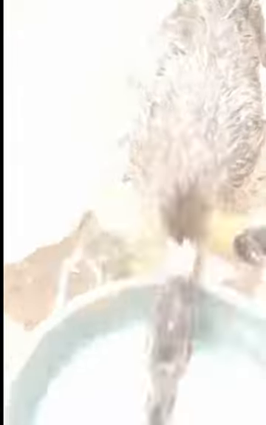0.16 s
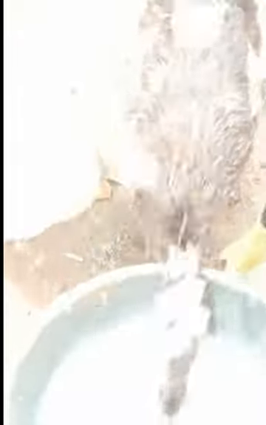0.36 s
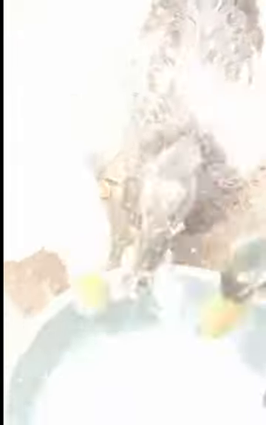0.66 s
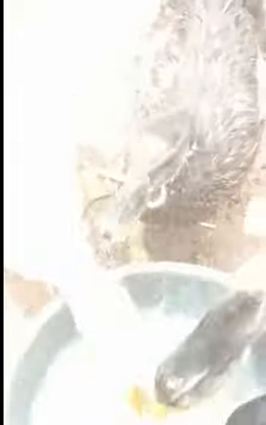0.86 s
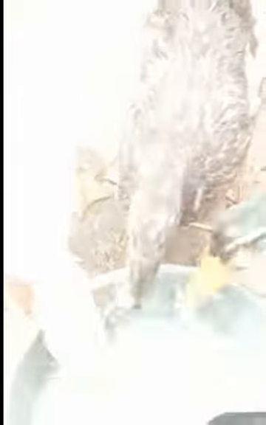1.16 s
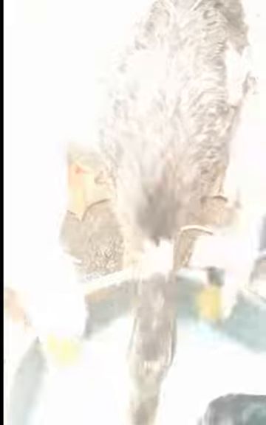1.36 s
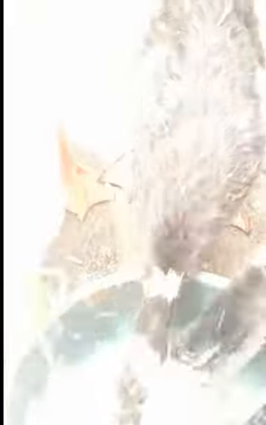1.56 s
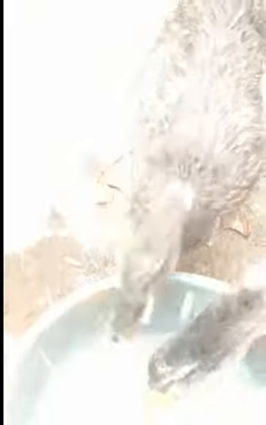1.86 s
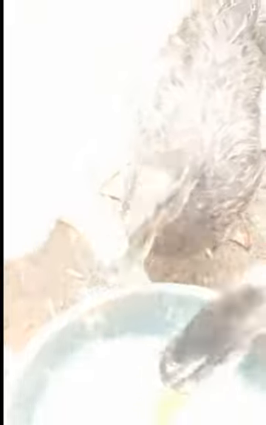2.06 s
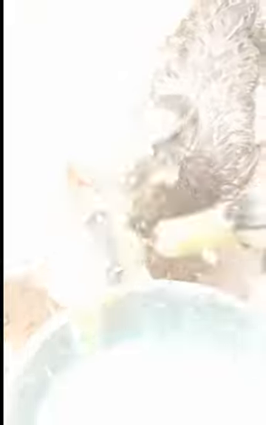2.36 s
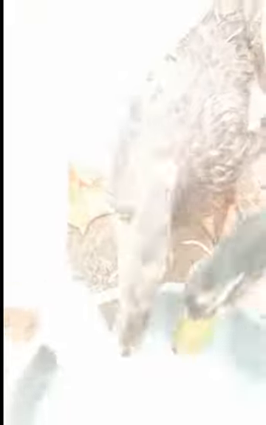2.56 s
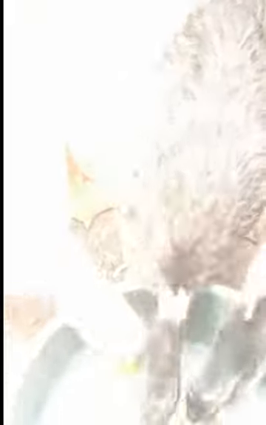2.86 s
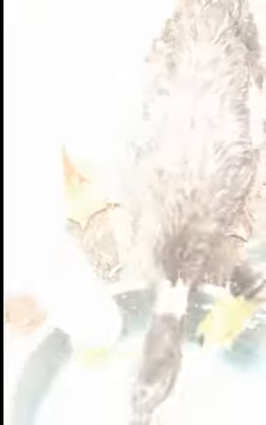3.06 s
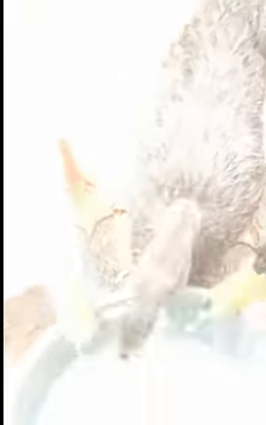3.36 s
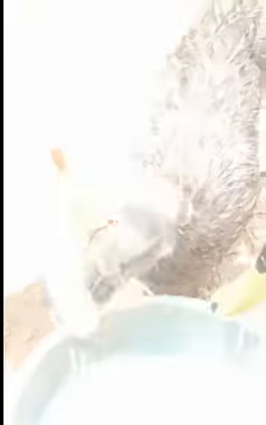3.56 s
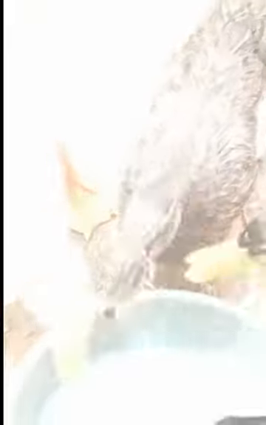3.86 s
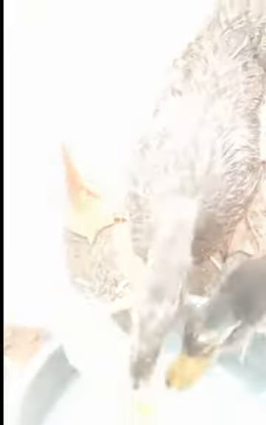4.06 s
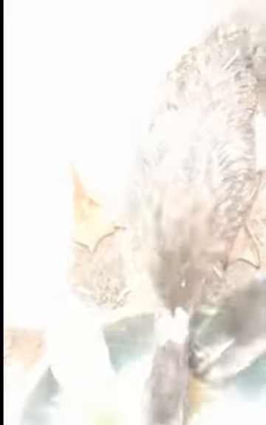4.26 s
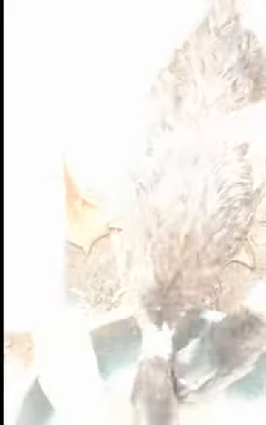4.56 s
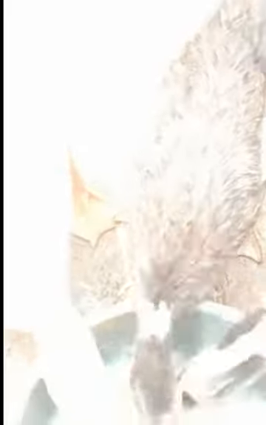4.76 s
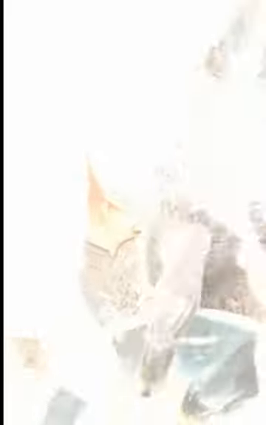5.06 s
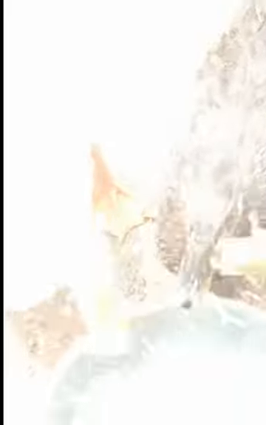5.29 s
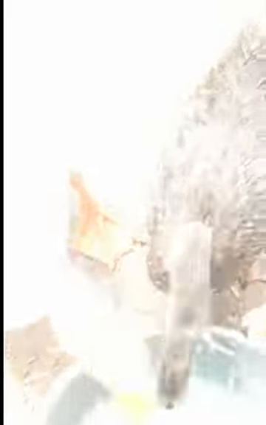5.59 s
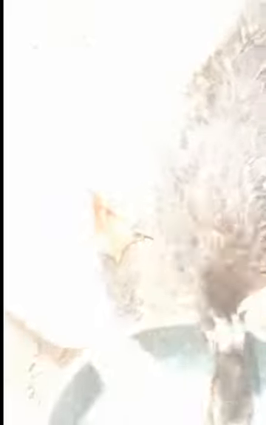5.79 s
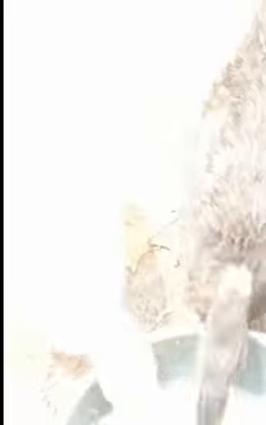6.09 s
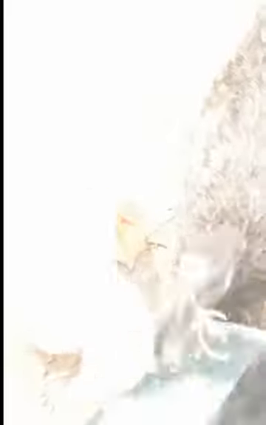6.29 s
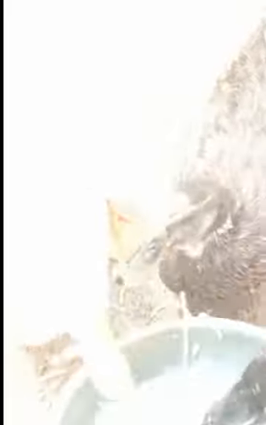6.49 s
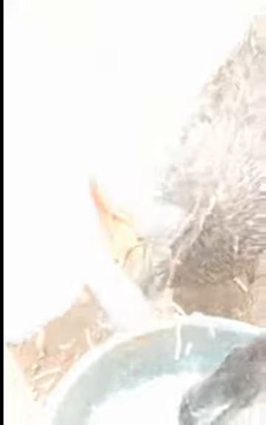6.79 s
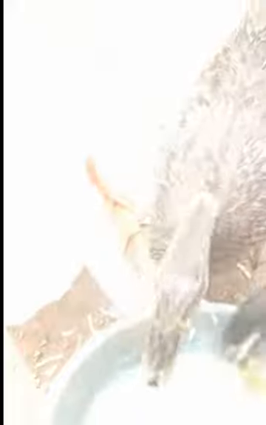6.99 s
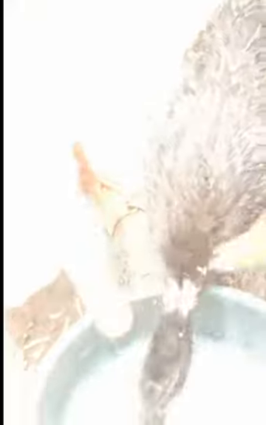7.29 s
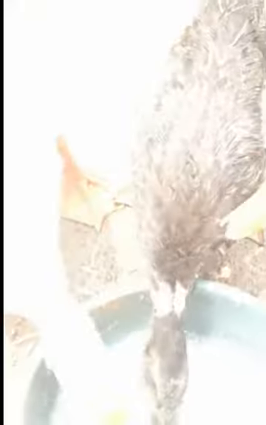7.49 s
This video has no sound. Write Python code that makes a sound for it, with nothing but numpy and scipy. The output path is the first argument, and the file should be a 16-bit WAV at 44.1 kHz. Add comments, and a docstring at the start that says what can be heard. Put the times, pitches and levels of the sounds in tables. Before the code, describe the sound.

Very close outdoors, ducks work their bills in a plastic bowl of water. Rapid bubbly chattering comes in uneven bouts, with hollow plops that ring the bowl and bright clicking drops. Short raspy quacks come mostly early. Past the middle a brief jet of water hisses, then two soft footfalls thud well apart. Dabbling and dripping continue, with lighter gaps, over faint air.

```python
"""Outdoors, close to the microphone, ducks dabble in a plastic bowl of water over faint low air.
From the start, short, rattling quacks (pulses ringing a throat) are scattered among bouts of churned bubbles.
Bills plunge with a hollow plop that rings the bowl, and drops click and ring as they fall back throughout.
Past the middle a jet of water hisses (shaped noise), then two soft footfalls thud, well apart.
Dabbling, drops and a few quacks go on towards the end; short echoes follow every near sound."""
import sys
import numpy as np
from scipy import signal
from scipy.fft import rfft, irfft, next_fast_len
from scipy.io import wavfile
from scipy.ndimage import map_coordinates

SR = 44100
rng = np.random.default_rng(int(sys.argv[2]) if len(sys.argv) > 2 else 0)


def wav_out(sig):
    """Save sig, one row per channel (or a flat mono array), as 16-bit PCM at SR to the path in sys.argv[1]."""
    wavfile.write(sys.argv[1], SR, np.round(np.clip(np.atleast_2d(sig).T, -1, 1) * 32767).astype(np.int16))


N = 336924


def amp(db):
    """Decibels to gain."""
    return 10 ** (np.asarray(db) / 20)


def unit(x):
    """x scaled to rms 1."""
    return x / np.sqrt(np.mean(x ** 2) + 1e-20)


def along(points, hz):
    """(frequency [Hz], value) points read on a log frequency axis."""
    point_hz, value = np.transpose(points)
    return np.interp(np.log(hz + 1), np.log(point_hz + 1), value)


def curves(rows):
    """One value per sample for each column after the time."""
    s, *columns = np.transpose(rows)
    return [np.interp(np.arange(N) / SR, s, column) for column in columns]


def wobble(rate):
    """A smooth random curve, rate knots a second."""
    knots = rng.standard_normal(int(N * rate / SR) + 4)
    return map_coordinates(knots, [np.arange(N) * rate / SR])


def add(track, s, sound):
    """Mix a sound into the track from time s on."""
    start = int(np.clip(round(s * SR), 0, N - 1))
    track[start:start + len(sound)] += sound[:N - start]


def coloured(x, gains, size=8192):
    """x through a causal, minimum-phase filter with the given (frequency [Hz], gain [dB]) points."""
    log_gain = np.log(amp(along(gains, np.fft.rfftfreq(size, 1 / SR))))
    cepstrum = irfft(log_gain)
    # folding the cepstrum forward makes the filter causal
    cepstrum[1:size // 2] *= 2
    cepstrum[size // 2 + 1:] = 0
    return signal.oaconvolve(x, irfft(np.exp(rfft(cepstrum))))[:N]


def swell(t, rise):
    """An envelope that reaches 1 at t = rise and then dies away."""
    u = np.maximum(t, 0) / rise
    return (u * np.exp(1 - u)) ** 2


def bubble(t, hz, rise, glide):
    """A pocket of air rings briefly; its pitch climbs for a positive glide, falls for a negative one."""
    bent_t = t + glide * (t - rise) ** 2 / (rise + t)
    return swell(t, rise) * np.sin(2 * np.pi * hz * bent_t)


def bubbles(rate, low_hz, high_hz, cycles, spread_db, size):
    """A cloud of random bubbles, many faint and a few strong, of rms 1."""
    draws = rng.random((int(rate * N / SR), 4), dtype=np.float32)
    when, pitch, life, strength = draws.T[:, :, None]
    hz = low_hz * (high_hz / low_hz) ** pitch
    gain = amp(-spread_db * np.log(strength + .01))
    rise = cycles * (.3 + 1.4 * life) / hz
    grains = gain * bubble(np.arange(size, dtype=np.float32) / SR, hz, rise, glide=.015)
    where = (when * N).astype(int) + np.arange(size)
    return unit(np.bincount(where.ravel(), grains.ravel(), N)[:N])


def bursts(times, levels_db, rise, t60):
    """An envelope that jumps at each event and dies away."""
    envelope, t = np.zeros(N), np.arange(SR // 5) / SR
    for s, db in zip(times, levels_db):
        add(envelope, s, amp(db - 60 * t / t60) * (1 - np.exp(-t / rise)))
    return envelope


# tone of the faint outdoor air: (frequency [Hz], relative level [dB])
AIR_TONE = [(20, -24), (60, 5), (130, 12), (280, 13), (600, -10), (900, -43), (2500, -27), (7000, -10.5),
            (9500, -35), (16000, -28)]


def outdoor_air():
    """Steady noise, strongest in the lows, lies behind everything."""
    return amp(-62.5) * unit(coloured(rng.standard_normal(N), AIR_TONE))


# a webbed foot pats the ground: (time [s], level [dB], pitch [Hz])
FOOT_PATS = [(5.199, -38.5, 220), (6.106, -33.5, 147)]


def footfalls():
    """Each step is one soft, low thud: a short swell of steady pitch."""
    track, t = np.zeros(N), np.arange(SR // 8) / SR
    for s, db, hz in FOOT_PATS:
        add(track, s, amp(db) * bubble(t, hz, 0.0053, glide=0))
    return track


# the duck's throat: (multiple of the call's throat pitch, relative level [dB], t60 [s])
THROAT_MODES = [(1.001, -13.5, 0.022), (1.38, -9, 0.015), (1.92, -19.5, 0.031), (2.3, -22, 0.059)]


def quack(length, throat_hz, bright_db, pulse_hz=76, glide=0.134):
    """Slow, uneven, raspy pulses of the syrinx ring the throat; its resonances rise as the bill opens."""
    call, t = np.zeros(SR // 6), np.arange(SR // 30) / SR
    ratio, mode_db, t60 = np.transpose(THROAT_MODES)[:, :, None]
    tilt_db = mode_db + bright_db * np.log2(ratio)
    for k, (strength, detune, phase) in enumerate(rng.standard_normal((8, 3, len(THROAT_MODES), 1))):
        # a drifting phase roughens each resonance
        rasp = np.cumsum(rng.standard_normal((len(THROAT_MODES), len(t))), axis=1) * .01
        progress = k / pulse_hz / length
        if progress >= 1:
            continue
        hz = throat_hz * ratio * (1 + glide * (progress - .5) + .045 * detune)
        gain = amp(tilt_db + 2.5 * strength - 60 * t / t60)
        ringing = (gain * np.sin(2 * np.pi * (hz * t + phase + rasp))).sum(0)
        pulse = ringing * (1 - np.exp(-t / .0025))
        start = int(abs(k + .26 * phase[0, 0]) / pulse_hz * SR)
        call[start:start + len(t)] += amp(-22 * (progress - .45) ** 2) * pulse
    return call / np.sqrt(np.sum(call ** 2) / (length * SR))


# quacks: (time [s], length [s], rms level [dB], throat pitch [Hz], brightness [dB per octave])
QUACK_CALLS = [(0.002, 0.033, -38.5, 1225, 2), (0.382, 0.052, -30.5, 1550, -1.5),
               (0.675, 0.074, -37, 1254, 3.5), (1.086, 0.037, -31.5, 1390, 1),
               (3.612, 0.062, -44, 1506, 0.5), (5.111, 0.042, -37.5, 1720, -6.5),
               (5.517, 0.088, -44.5, 1587, -7), (6.153, 0.054, -43, 1646, 0),
               (6.936, .042, -44.5, 1615, -15), (7.006, .028, -45, 1840, -15),
               (7.323, 0.061, -39.5, 1550, -17)]


def quacks():
    """The ducks call softly, each call with its own throat pitch and brightness."""
    track = np.zeros(N)
    for s, length, db, throat_hz, bright_db in QUACK_CALLS:
        add(track, s, amp(db) * quack(length, throat_hz, bright_db))
    return track


# a hissing jet of water squeezed from a bill: (time [s], level [dB])
JET_LEVEL = [(4.62, -62), (4.74, -26.5), (4.799, -19), (4.855, -16.5), (4.885, -31.5), (4.94, -77)]
# tone of the jet's mist: (frequency [Hz], relative level [dB])
JET_TONE = [(1500, -19), (3000, 6.5), (5000, 8.5), (7000, 14.5), (10000, -8.5), (16000, -1.5)]


def jet():
    """The squirt breaks up into a fine, bright mist: shaped noise with a fluttering level."""
    s, db = np.transpose(JET_LEVEL)
    level_db = np.interp(np.arange(N) / SR, s, db, left=-120, right=-120)
    return amp(level_db + 1.3 * wobble(82)) * unit(coloured(rng.standard_normal(N), JET_TONE))


def seethe(grains, level_db):
    """Calm water hisses smoothly; the harder it is stirred, the more its single bubbles stand out."""
    share = np.interp(level_db, [-54, -36], [.3, .85])
    return np.sqrt(share) * grains + np.sqrt(1 - share) * rng.standard_normal(N)


def nibbling(rate, base):
    """Quick, uneven snaps of the bills: each squeezes out a sharp spurt of bubbles. Rms 1."""
    when, size = rng.random((int(rate * N / SR), 2)).T
    times = (np.arange(len(when)) + 1.6 * when) / rate
    return unit(np.hypot(base, bursts(times, -11 * size, rise=.0005, t60=.05)))


# bouts of dabbling, while a bill works in the water; churn() trims the levels:
# (start [s], length [s], sloshing [dB], bubbling [dB], spray [dB])
DABBLING_BOUTS = [(0.0, 0.597, -69, -45.5, -40.5), (0.862, 0.43, -43, -29.5, -36),
                  (1.514, 0.079, -43, -31, -32.5), (1.759, 0.15, -58, -37.5, -50),
                  (2.051, 0.3, -72.5, -47.5, -47), (2.541, 0.13, -54, -34.5, -38.5),
                  (2.758, 0.28, -42, -30, -34), (3.816, 0.3, -53, -35.5, -38.5),
                  (4.176, .67, -37.5, -30, -31), (5.131, 0.082, -61.5, -40, -42.5),
                  (5.769, 0.19, -38.5, -30.5, -35), (6.053, 0.13, -65, -36, -47),
                  (6.35, 0.28, -46, -36, -39), (7.289, 0.03, -54, -40.5, -53),
                  (7.511, 0.055, -45, -37.5, -39)]
# dying down once the bill lifts: (sloshing, bubbling, spray) [dB per s]
SETTLING = (149, 83, 72)
# water running off the lifted bill, relative to the bout: (sloshing, bubbling, spray) [dB]
DRIBBLE = (-23, -15, -7.5)
DIP_S = 0.094  # the bill sinks in and the churning builds up
DRAIN_DB_PER_S = 13.5  # the dribble thins out


def stirring():
    """Levels in dB of sloshing, bubbling and spray: each bout builds, holds, settles and dribbles."""
    t, power = np.arange(0, N, 64) / SR, 1e-9
    settle, dribble_db = np.array([SETTLING, DRIBBLE])[:, :, None]
    for start, length, *levels_db in DABBLING_BOUTS:
        build = np.clip(1 + (t - start) / DIP_S, 0, 1) ** 2
        lifted = np.maximum(t - start - length, 0)
        fade_db = np.maximum(-settle * lifted, dribble_db - DRAIN_DB_PER_S * lifted)
        power = power + (build * amp(np.array(levels_db)[:, None] + fade_db)) ** 2
    return curves(np.column_stack([t, *(10 * np.log10(power))]))


# filters that tone the large bubbles, the middle ones, the small ones and the finest mist flung up
# by the sloshing; each result is levelled to rms 1: (frequency [Hz], relative gain [dB])
SLOSH_TONE = [(30, -39), (150, -21.5), (250, -10), (480, -1.5), (660, 0), (830, -6), (1300, 1),
              (3000, -39.5)]
FROTH_TONE = [(300, -73), (850, -16.5), (1250, -14), (2000, 3), (3200, 4), (4200, -6), (6000, 7.5),
              (9000, -31)]
FIZZ_TONE = [(1000, -27.5), (2800, -7), (4500, -7), (6000, -1), (7200, 5), (9000, -21.5), (16000, -21)]
HAZE_TONE = [(5000, -46), (8000, 1), (9500, -2), (13000, -3), (16000, 4)]
HAZE_DB, HAZE_GROWS = -22.5, 0.65  # mist over the scaled sloshing [dB]; dB of mist per dB of sloshing
LEAD_S = 0.0038  # water starts to splash just before a drop's bubble is loudest


def churn():
    """Chattering bills stir three sizes of bubbles and a fine mist; plunges and drops throw up more."""
    slosh_db, bubbling_db, spray_db = stirring()
    # the snaps stand out while the bills work and soften in the pauses
    busy = np.interp(bubbling_db, [-54, -42], [.45, .95])
    chatter = busy * nibbling(rate=52, base=.17) + 1 - busy

    plunge_s, plunge_db, _, slap_db = np.transpose(BILL_PLUNGES)
    drop_s, level_db, drop_hz, life = np.transpose(LOUD_DROPS)
    drop_db = level_db - 10 * np.log10(np.maximum(life / .001, 1))  # long ringing drops splash less
    octaves = np.log2(drop_hz / 4500)  # high drops scatter finer spray
    slaps = bursts(plunge_s, plunge_db + slap_db - 7.5, rise=0.0011, t60=0.058)
    coarse_db = drop_db - 11.5 - 10 * np.maximum(octaves, 0)
    coarse = bursts(drop_s - LEAD_S, coarse_db, rise=.005, t60=0.041)
    fine = bursts(drop_s - LEAD_S, drop_db - 6.5 + 3 * octaves, rise=0.0039, t60=0.025)
    flung = bursts(plunge_s, plunge_db - 26, rise=0.0012, t60=0.1)

    slosh = bubbles(260, 161.7, 1516, cycles=1.26, spread_db=0.5, size=1800)
    froth = bubbles(900, 1150, 4800, cycles=2.4, spread_db=3.8, size=700)
    fizz = bubbles(2100, 3200, 14000, cycles=3.4, spread_db=4.4, size=270)
    slosh = unit(coloured(slosh, SLOSH_TONE))
    haze = unit(coloured(seethe(fizz, slosh_db - 20), HAZE_TONE))
    froth = unit(coloured(seethe(froth, bubbling_db - 2), FROTH_TONE))
    fizz = unit(coloured(seethe(fizz, spray_db - 4), FIZZ_TONE))

    # independent causes add as powers
    slosh_gain = amp(slosh_db + 2.2) * np.sqrt(chatter)
    froth_gain = np.hypot(amp(bubbling_db - 2.5) * chatter, np.hypot(slaps, coarse))
    fizz_gain = np.hypot(amp(spray_db + 2.0) * chatter, fine)
    haze_gain = np.hypot(amp(HAZE_GROWS * slosh_db + HAZE_DB) * chatter, flung)
    return slosh * slosh_gain + froth * froth_gain + fizz * fizz_gain + haze * haze_gain


STRAYS_PER_S = 8.1  # smaller drops fall at random
STRAY_DB, STRAY_SPREAD_DB = 3.5, 7  # highest level over the scaled spray; how far below it they range
STRAY_LOW_HZ, STRAY_HIGH_HZ, STRAY_LIFE_S = 1720, 7580, 0.0017  # range of bubble pitch, mean life
STRAY_GROWS = 0.59  # dB of drop per dB of spray


def strays():
    """Smaller drops at random, as rows like LOUD_DROPS: the more spray, the harder they fall."""
    spray_db = stirring()[2]
    when, size, pitch, life = rng.random((int(STRAYS_PER_S * N / SR), 4)).T
    spray_then_db = spray_db[(when * N).astype(int)]
    level_db = STRAY_GROWS * spray_then_db + STRAY_DB - STRAY_SPREAD_DB * size
    hz = STRAY_LOW_HZ * (STRAY_HIGH_HZ / STRAY_LOW_HZ) ** pitch
    return list(zip(when * N / SR, level_db, hz, STRAY_LIFE_S * (.5 + life)))


# the loudest drops and wet bill clicks: (time [s], level [dB], bubble pitch [Hz], life [s])
LOUD_DROPS = [(0.209, -8, 3400, .0008), (.448, -11, 5060, 0.00034), (.556, -17, 3450, 0.0014),
              (0.7818, -6, 7450, 0.00036), (0.8614, 0.5, 4070, 0.00064), (0.872, -5, 2310, 0.0011),
              (.9374, -8, 2300, 0.00092), (.943, 0, 3020, 0.0012), (1.037, -9, 2270, 0.00089),
              (1.126, -9, 6370, .0009), (1.153, -9, 2050, .0024), (1.272, -13, 3040, .0013),
              (1.4025, -12, 2980, 0.0022), (1.464, -7, 6080, 0.0014), (1.566, -6.5, 7170, 0.0024),
              (1.638, -5, 2970, 0.0013), (1.7512, -6.5, 2940, .0005), (1.756, -5.5, 5000, .0007),
              (2.023, -4, 6620, 0.0012), (2.041, -19, 2030, 0.0027), (2.654, -12.5, 5800, .001),
              (2.837, -7.5, 6830, .001), (2.897, -0.5, 3140, .0008), (2.9727, -9.5, 3400, 0.0009),
              (3.006, -10.5, 6170, 0.00085), (3.071, -10, 1940, 0.0025), (3.223, -15.5, 6300, .0009),
              (3.3191, -9.5, 3290, 0.0035), (3.7226, -16.5, 7250, .0031), (4.55, -5, 3220, 0.00071),
              (4.614, -8, 7250, 0.0024), (5.139, -16.5, 6050, .0012), (5.191, -9, 7330, .0012),
              (5.28, -6.5, 6980, .001), (5.287, -5, 3980, 0.00064), (5.2897, -3, 6980, 0.00099),
              (5.796, -5.5, 3040, .0008), (5.916, -6.5, 2220, 0.0014), (6.1272, -18, 6600, .001),
              (6.335, -10.5, 1990, 0.00073), (6.5163, -8, 7170, 0.0013), (6.592, -4.5, 3694, .0015),
              (6.6176, -13, 2250, 0.0014), (6.771, -13.5, 7140, 0.00097), (6.832, -15.5, 2980, .0005),
              (7.302, -14, 6530, .0012), (7.399, -18.5, 6700, 0.00076), (7.4553, -15, 6600, 0.00062),
              (7.5853, -9.5, 6400, .001)]


def drops():
    """Each drop clicks on the surface and traps one loud bubble, with three smaller ones after it."""
    track, t = np.zeros(N), np.arange(SR // 30) / SR
    for s, db, hz, life in LOUD_DROPS + strays():
        rise = .52 * life
        splash = min(1, .001 / life)  # a gentle drop rings longer and splashes less
        click = splash * amp(-10) * bubble(t, 4200, .00016, glide=.02)
        add(track, s - rise, amp(db) * (bubble(t, hz, rise, glide=.02) + click))
        for delay, pitch, size in rng.random((3, 3)):
            small_hz = min(hz * 2 ** (1.4 * (pitch - .6)), 7500)
            small = bubble(t, small_hz, .0005, glide=.02)
            add(track, s + .006 * delay, splash * amp(db - 8 - 9 * size) * small)
    return track


GULPS_PER_S = 14  # a working bill pumps the water
GULP_DB, GULP_SPREAD_DB = 18, 10  # highest level over the sloshing; how far below it they range
GULP_HZ, GULP_SLAP_DB = 383, -1  # middle cavity pitch; slap as in BILL_PLUNGES


def gulps():
    """Small plunges in an uneven beat all through each bout, as rows like BILL_PLUNGES."""
    rows = []
    for start, length, slosh_db, _, _ in DABBLING_BOUTS:
        for k, (late, size, pitch) in enumerate(rng.random((12, 3))):
            s = (k + .6 * late) / GULPS_PER_S
            if s < length:
                level_db = slosh_db + GULP_DB - GULP_SPREAD_DB * size
                rows.append((start + s, level_db, GULP_HZ * 2 ** (pitch - .5), GULP_SLAP_DB))
    return rows


# a bill strikes into the water; plunges() trims the slap:
# (time [s], level [dB], cavity pitch [Hz], slap relative to the level [dB])
BILL_PLUNGES = [(.205, -15.5, 570, -3.5), (.272, -16.5, 442, -2.5), (0.346, -23, 340, -8),
                (.772, -17.5, 486, 2), (.852, -11, 536, -3.5), (1.223, -17, 686, 3), (1.424, -25, 447, 3.5),
                (1.554, -18, 503, 7.5), (1.865, -29.5, 530, 8.5), (2.546, -23.5, 497, 1),
                (2.599, -17.5, 620, 2), (2.744, -16.5, 563, 2.5), (2.773, -16, 520, 1.5),
                (2.836, -15, 365, 3.5), (2.907, -16, 406, 5), (3.418, -24, 560, 2.5),
                (3.767, -21.5, 252, 1), (3.824, -19.5, 590, -11), (3.95, -25, 583, -9),
                (4.069, -22, 660, -5), (4.192, -17.5, 500, -6), (4.315, -10.5, 435, -4.5),
                (4.78, -18.5, 358, 2.5), (5.012, -30, 436, 0), (5.68, -18, 500, -0.5),
                (5.743, -15, 470, -1.5), (6.237, -25.5, 685, 7), (6.334, -13.5, 400, -3),
                (6.397, -22, 267, 2), (6.454, -20, 353, 3), (6.522, -18, 534, -7), (7.055, -20, 260, -6),
                (7.227, -20.5, 586, 1)]
# modes of the bowl with its water: (middle pitch [Hz], relative level [dB], t60 [s])
BOWL_MODES = [(246.5, -3.5, 0.12), (334.7, -2.5, 0.15), (395.7, -1, 0.11), (500, 4, 0.087), (594, 5, 0.059),
              (683, -8, .17)]
PLOP_CYCLES = 1.44  # swings of a cavity until it is loudest


def plunges():
    """A cavity plops, falling in pitch, and rings the bowl, differently as the water shifts."""
    track, t = np.zeros(N), np.arange(SR // 6) / SR
    mode_hz, mode_db, t60 = np.transpose(BOWL_MODES)[:, :, None]
    fading = amp(mode_db - 13 - 60 * t / t60) * (1 - np.exp(-t / 0.0032)) ** 2
    for s, db, hz, slap_db in BILL_PLUNGES + gulps():
        strength, phase, shift = rng.standard_normal((3, len(BOWL_MODES), 1))
        ringing = np.sin(2 * np.pi * (mode_hz * (1 + 0.0318 * shift) * t + phase))
        modes = amp(2.5 * strength) * fading * ringing
        plop = amp(-1.5) * bubble(t, hz, PLOP_CYCLES / hz, glide=-0.16)
        slap_hz = 1380 * np.exp(0.18 * rng.standard_normal())
        slap = amp(slap_db - 3.5) * bubble(t, slap_hz, 0.0007, glide=0.037)
        add(track, s + 0.00151, amp(db) * (plop + modes.sum(0) + slap))
    return track


def yard(x, t60):
    """Short, scattered echoes from the bowl's wall, the ground and the birds: a fading noise tail."""
    t = np.arange(SR // 4) / SR
    tail = rng.standard_normal(len(t)) * amp(-60 * t / t60) * (1 - np.exp(-t / 0.00022))
    return signal.fftconvolve(x, tail / np.linalg.norm(tail))[:N]


def scene():
    """Water and birds close by, with their echoes, over faint outdoor air."""
    near = footfalls() + quacks() + jet() + churn() + drops() + plunges()
    return (outdoor_air() + near + amp(-9.5) * yard(near, t60=0.086))[None]


# response of the microphone: (frequency [Hz], gain [dB])
MICROPHONE_RESPONSE = [(25, -36), (70, -15), (130, -6.5), (220, -3), (7400, 0.5), (7800, -0.5), (8300, -5),
                       (9200, -2.5), (11000, -5), (13500, -2.5), (14800, 2.5), (15700, 6.5)]
TOP_HZ = 16000  # band limit


def record(dry):
    """The microphone thins the bass, dips in the treble and keeps nothing above its band limit."""
    size = next_fast_len(N + 8192)
    spectrum = rfft(coloured(dry[0], MICROPHONE_RESPONSE), size)
    in_band = np.fft.rfftfreq(size, 1 / SR) < TOP_HZ
    return irfft(spectrum * in_band, size)[None, :N]


dry = scene()
out = record(dry)
wav_out(out)
```